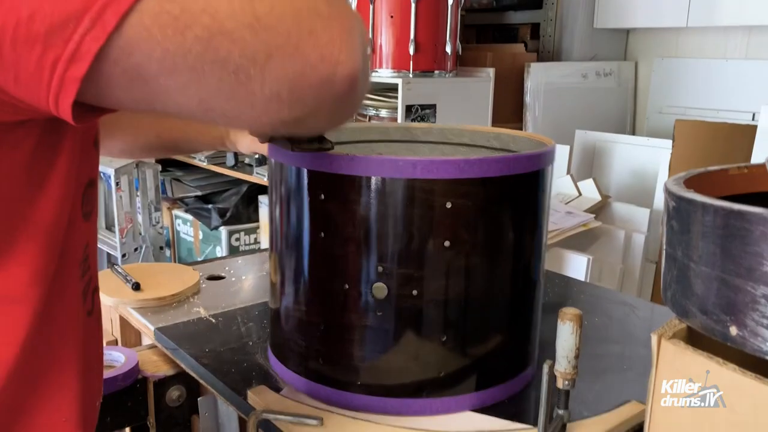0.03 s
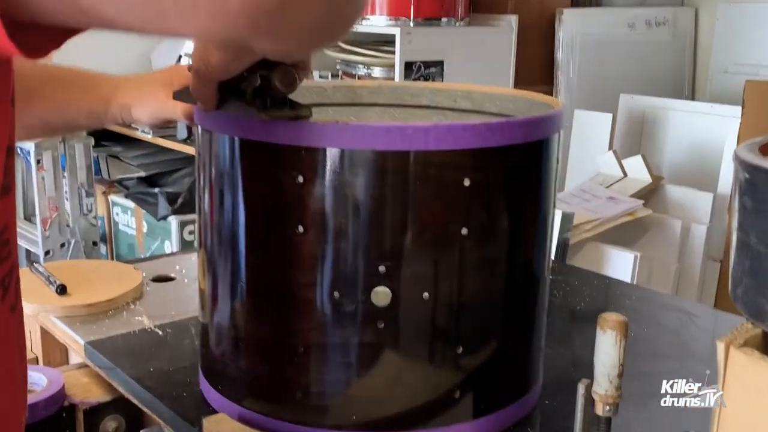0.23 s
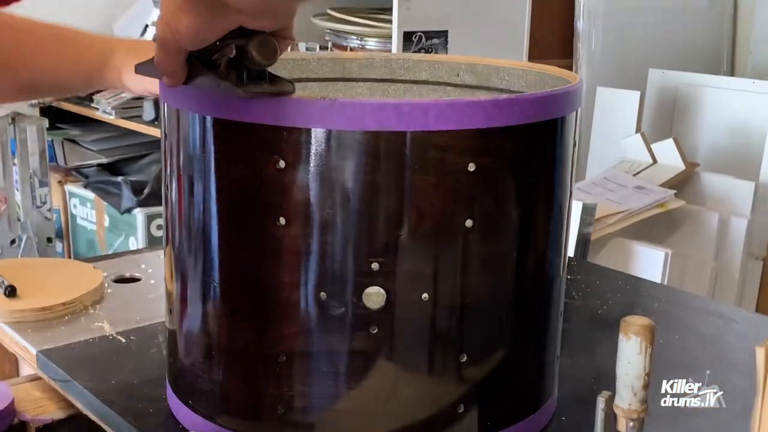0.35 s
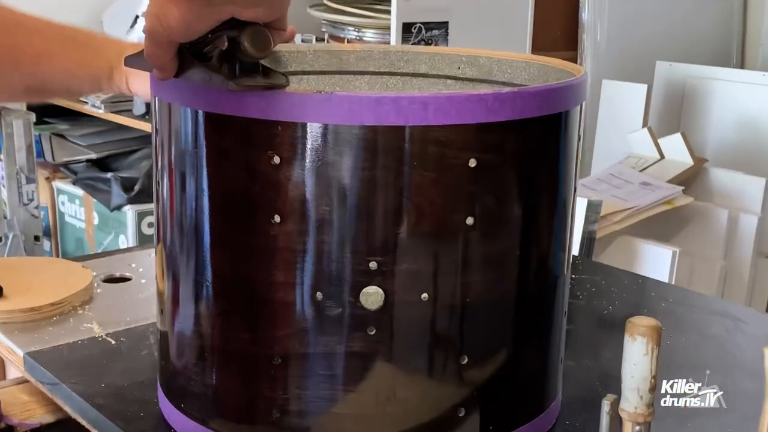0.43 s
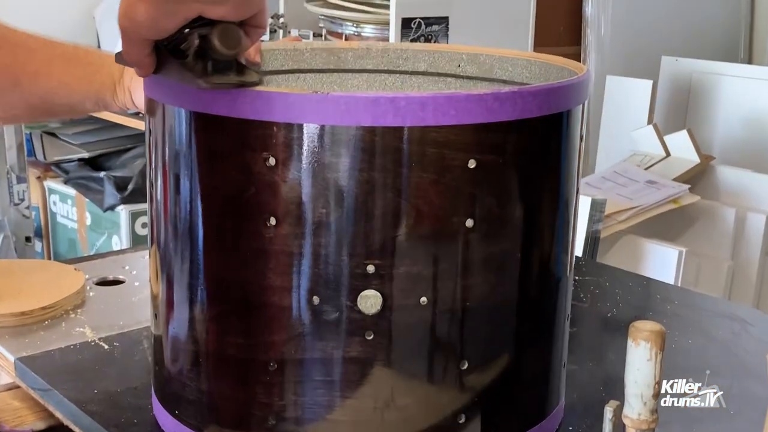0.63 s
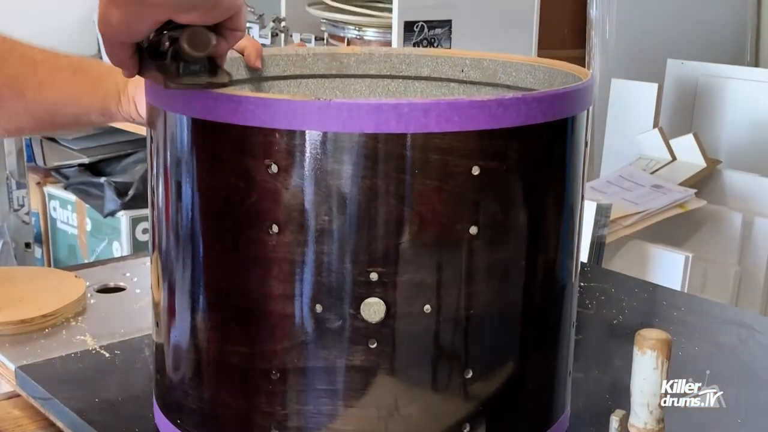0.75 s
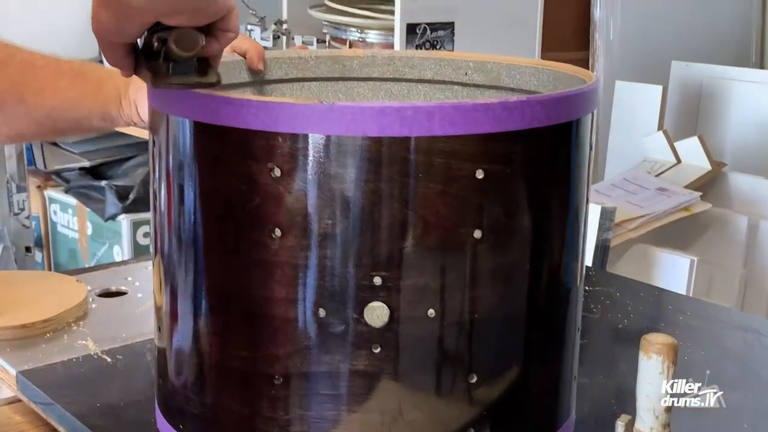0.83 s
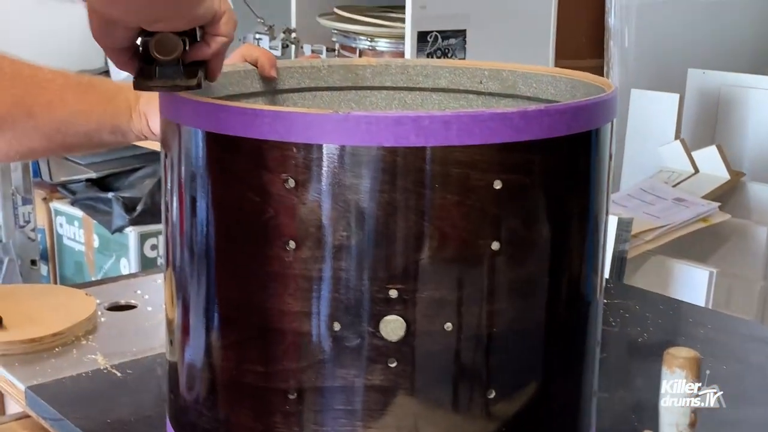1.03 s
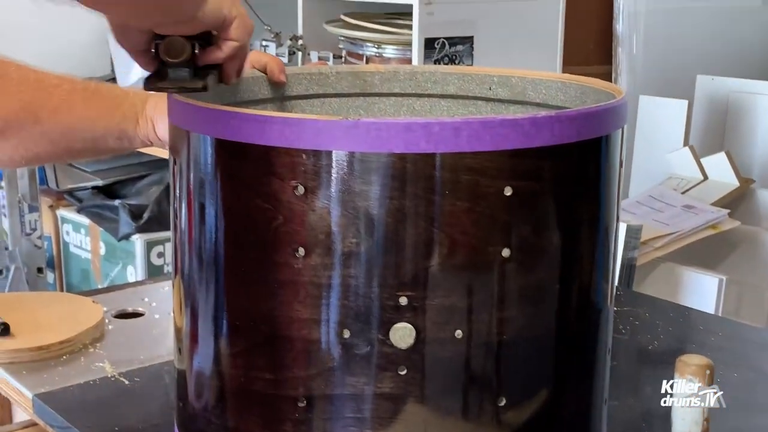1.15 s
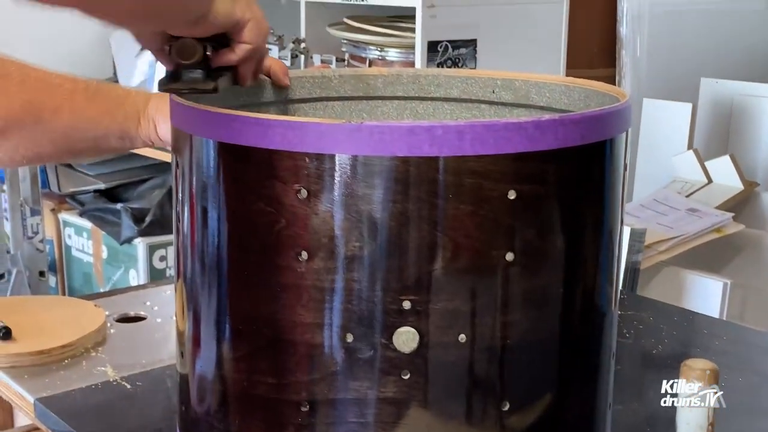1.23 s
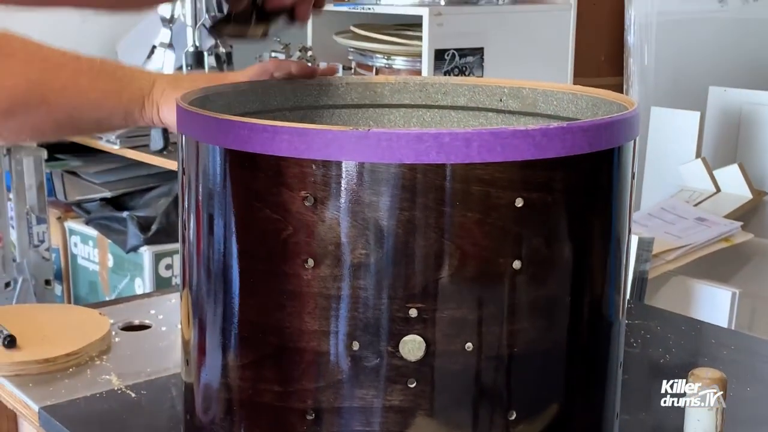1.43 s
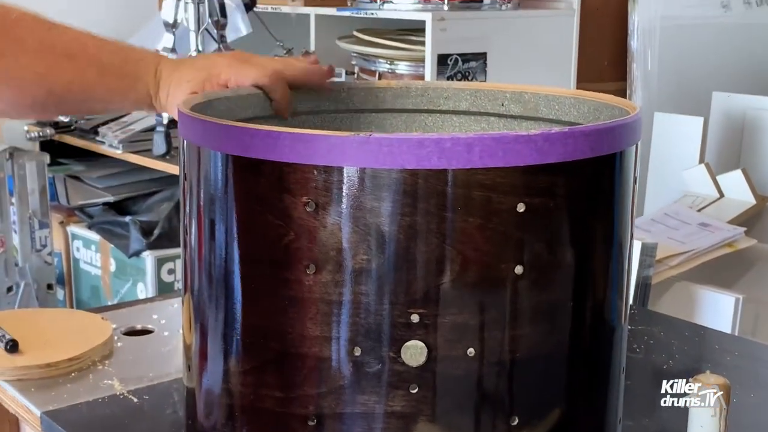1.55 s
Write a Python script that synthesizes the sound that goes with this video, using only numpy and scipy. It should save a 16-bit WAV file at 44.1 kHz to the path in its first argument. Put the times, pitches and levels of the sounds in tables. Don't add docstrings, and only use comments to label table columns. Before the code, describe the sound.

Hand plane on a hollow wooden drum rim: short slide, sharp knocks, long hissing, chattering shaving

```python
import sys
import numpy as np
from scipy import signal
from scipy.fft import rfft, irfft, next_fast_len
from scipy.io import wavfile

SR = 44100
rng = np.random.default_rng(int(sys.argv[2]) if len(sys.argv) > 2 else 0)


def wav_out(sig):
    wavfile.write(sys.argv[1], SR, np.round(np.clip(np.atleast_2d(sig).T, -1, 1) * 32767).astype(np.int16))


def field_ratio(decibels):
    return 10 ** (np.asarray(decibels, dtype=float) / 20)


N = 70560

# time in seconds, place along the rim from 0 to 1.
PLACE_ON_RIM = [(0, 0.69), (.3, 0.8), (.56, 0.5), (1.32, 0.9), (1.6, 1)]


def rms_one(x):
    return x / np.sqrt(np.mean(x ** 2) + 1e-20)


def in_time(rows):
    s, *columns = np.transpose(rows)
    return [np.interp(np.arange(N) / SR, s, c) for c in columns]


def at_hz(points, hz):
    table_hz, values = np.transpose(points)
    return np.interp(np.log(hz + 1), np.log(table_hz), values)


def colour(x, gain):
    size = next_fast_len(2 * N)
    hz = np.arange(size // 2 + 1) * SR / size
    return irfft(rfft(x, size) * gain(hz), size)[..., :N]


def drift(rate_hz):
    r = np.exp(-2 * np.pi * rate_hz / SR)
    noise = rng.standard_normal(N + SR)
    return rms_one(signal.lfilter([1], [1, -2 * r, r * r], noise)[SR:])


def ring(x, hz, width_hz):
    r, w = np.exp(-np.pi * width_hz / SR), 2 * np.pi * hz / SR
    return signal.lfilter([.5, 0, -.5], [1, -2 * r * np.cos(w), r * r], x + 1e-18)


def wide_ring(x, hz, share):
    width_hz = share * hz
    return ring(x, hz, width_hz) * 2 * np.pi * width_hz / SR


def mode(x, hz, width_hz):
    return ring(wide_ring(x, hz, .6), hz, width_hz)


def floor():
    # frequency in Hz, level in dB per Hz.
    rumble_spectrum = [(18, -13), (30, 7), (104, 12.5), (152, 0), (565, -13), (955, -6), (1300, -14),
                       (1730, -22), (9000, -37.5), (11700, -81), (19800, -120)]
    rumble_db, whine_db, whine_hz = -53.5, -78, 910
    common, *own = rng.standard_normal((3, N))
    air = colour(common + 0.37 * np.array(own), lambda hz: field_ratio(at_hz(rumble_spectrum, hz)) * (hz > 40))
    whine = rms_one(ring(common, whine_hz, 90))
    return field_ratio(rumble_db + 2.0 * drift(14)) * rms_one(air) + field_ratio(whine_db) * whine


def pressure():
    # time in seconds, cutting hiss in dB, drive into the shell in dB.
    stroke = [(.03, -87, 21.5), (.062, -58, 12), (.13, -55, 6), (.195, -53.5, 4.5), (.222, -46, 18),
              (.29, -58, 11.5), (.36, -83, 9.5), (.545, -87, 15), (.575, -65, 23), (.6, -51, 16),
              (.66, -45, 14), (.77, -39.5, 6.5), (.88, -40, 6.5), (.97, -43.5, 9), (1.1, -42.5, 10.5),
              (1.166, -36, 5.5), (1.296, -43.5, 8), (1.335, -66, 7)]
    # time in seconds, level in dB.
    brushes = [
        (0.489, -74.5),
        (1.371, -70),
        (1.455, -68),
    ]
    lift_off_db_per_s, brush_s = 411, .015
    t = np.arange(N) / SR
    hiss_db, drive_db = in_time(stroke)
    gain = field_ratio(hiss_db - lift_off_db_per_s * np.maximum(t - stroke[-1][0], 0))
    for s, db in brushes:
        gain = gain + field_ratio(db) * np.exp(-.5 * ((t - s) / brush_s) ** 2)
    return gain, field_ratio(drive_db)


def fibres():
    ticks_per_s, spread_db, flicker_db, flicker_hz = 6000, 1.5, .8, 120
    sizes = field_ratio(spread_db * np.minimum(rng.exponential(1, N), 4)) * rng.standard_normal(N)
    torn = rng.random(N) < ticks_per_s / SR
    return rms_one(sizes * torn * field_ratio(flicker_db * drift(flicker_hz)))


def iron():
    # frequency in Hz, level in dB per Hz.
    hiss_spectrum = [(2000, -10), (2400, 0), (3300, 2), (5600, 1.5), (8000, -2), (10800, -6), (12000, -15),
                     (15500, -1.5)]
    # frequency in Hz, width in Hz, level over the hiss in dB,
    # place where loudest from 0 to 1, loss one stroke away in dB.
    iron_modes = [(2702, 22, 5.5, 0, 28), (3062, 95, -12.5, 0.42, -13), (4436, 66, -6.5, 0.07, 23),
                  (4664, 74, -7, 0.5, -1), (6530, 47, -14.5, 0.6, 5), (7130, 97, -6, 0.14, 19.5),
                  (9630, 2200, -4, .5, 19)]
    slide_ends_s, sheen_db, sheen_hz = .4, 5, 8000
    tear = fibres()
    place, = in_time(PLACE_ON_RIM)
    edge = colour(tear, lambda hz: field_ratio(at_hz(hiss_spectrum, hz)) / (1 + (1800 / (hz + 1)) ** 4))
    high_pass = signal.butter(2, sheen_hz, "high", fs=SR, output="sos")
    sheen = signal.sosfilt(high_pass, fibres()) * (np.arange(N) < slide_ends_s * SR)
    rings = np.zeros(N)
    for hz, width_hz, db, best, lost_db in iron_modes:
        rings += field_ratio(db - lost_db * (place - best) ** 2) * rms_one(ring(tear, hz, width_hz))
    gain, _ = pressure()
    return gain * (rms_one(edge) + rings + field_ratio(sheen_db) * sheen)


def shell():
    # frequency in Hz, width in Hz, level where loudest in dB,
    # place where loudest from 0 to 1, loss one stroke away in dB.
    shell_modes = [(201.7, 23.6, 1, 1, 70), (314.3, 17.7, -7.5, 1, -8), (334.8, 7.6, 3.5, 0, 21),
                   (370.7, 34, -4, 0.71, 69), (440.6, 54, -5, 0.24, 11), (640, 24, 0, .2, 30),
                   (675, 20, 2, .2, 40), (713, 20, 2, .25, 45) , (854, 240, -9, .4, -0.5),
                   (1215, 220, -8, 0.2, 4), (1487, 32, -8.5, 1, 0), (1561, 17, -5.5, .28, 35),
                   (1660, 310, -10, 1, 16), (1998, 71, -7, 0.69, 60)]
    # time in seconds, level in dB, pitch of the jolt in Hz.
    catches = [(.606, -28, 680), (.634, -27, 680), (.6580, -18, 680), (.688, -26, 680), (.7180, -18, 690),
               (.7460, -23, 690), (.7735, -24, 690), (.802, -24, 700), (.572, -36, 680), (.835, -29, 700),
               (.870, -29, 700), (.780, -33, 1550), (.950, -35, 2025), (1.010, -31, 200), (1.085, -28, 360),
               (1.147, -24, 300), (1.166, -23, 200)]
    wood_band_hz, wood_bed_db, wander_db = [265, 2160], 2, .8
    gain, drive = pressure()
    place, = in_time(PLACE_ON_RIM)
    tear = fibres() * gain * drive
    jolts = np.zeros(N)
    for s, db, hz in catches:
        click = field_ratio(db) * (np.arange(N) == int(s * SR))
        jolts += wide_ring(click, hz, .2)
    band = signal.butter(3, wood_band_hz, "band", fs=SR, output="sos")
    out = field_ratio(wood_bed_db) * signal.sosfilt(band, tear)
    for hz, width_hz, db, best, lost_db in shell_modes:
        own = tear * rng.choice([-1, 1], N) * field_ratio(wander_db * drift(4.2))
        push = own * np.sqrt(4 * np.pi * width_hz / SR) + jolts
        out += mode(push * field_ratio(db - lost_db * (place - best) ** 2), hz, width_hz)
    return out


def knocks():
    # time in seconds, level in dB, contact cut-off in Hz,
    # share in the bench from 0 to 1.
    blows = [
        (0.187, -29.5, 197, 0.8),
        (0.2183, -8.5, 3380, 0.61),
        (0.2234, -13, 583, 0.6),
        (0.2383, -18, 740, 0.78),
        (.2670, -32, 3500, 1),
        (0.2722, -16, 940, 1),
        (.2860, -25.5, 1140, 1),
        (.5000, -26.5, 1500, 0),
        (1.298, -30, 428, 0.48),
    ]
    # frequency in Hz, level in dB, decay time t60 in seconds.
    bench_modes = [(102, -1.5, 0.092), (209, -9, 0.03), (250.1, 0, 0.15), (269.4, -10, 0.12),
                   (422, -7, 0.17), (613.5, -14, 0.2), (695, 3, 0.013), (903.4, -2.5, 0.066),
                   (991, -22.5, 0.21), (1322, -7.5, 0.023), (1438, -29, 0.18), (2060, -27, 0.036),
                   (2488, -15, 0.02)]
    rim_modes = [(91, -1, 0.21), (154, -1.5, 0.19), (218.2, 5, 0.12), (233, -12, 0.058), (358.5, -13, 0.24),
                 (440, -23, 0.069), (643, -6.5, 0.061), (1260, -25, .04), (1500, -16, .04)]
    modes = [*bench_modes, *rim_modes]
    out = np.zeros(N)
    luck_db = rng.normal(0, 1.5, (len(blows), len(modes)))
    for (s, db, cut_hz, share), row in zip(blows, luck_db):
        click = np.zeros(SR // 2)
        click[0] = field_ratio(db)
        contact = signal.butter(2, [cut_hz / 6, cut_hz], "band", fs=SR, output="sos")
        click = signal.sosfilt(contact, click)
        gains = [share] * len(bench_modes) + [1 - share] * len(rim_modes)
        rung = np.zeros(SR // 2)
        for (hz, level_db, t60), g, v in zip(modes, gains, row):
            width_hz = np.log(1000) / np.pi / t60
            rung += g * field_ratio(level_db + v) * mode(click, hz, width_hz)
        i = int(s * SR)
        out[i:i + SR // 2] += rung[:N - i]
    return out


def cracks():
    # start in seconds, level in dB.
    ticks = [
        (.2178, -30),
        (.2405, -36),
        (.267, -36),
    ]
    t60 = 0.004
    t = np.arange(N) / SR
    shape = sum(field_ratio(db - 60 * np.abs(t - s) / t60) * (t >= s) for s, db in ticks)
    return colour(shape * rng.standard_normal(N), lambda hz: hz / (hz + 800) / (1 + hz / 4000))


def workshop(x):
    # frequency in Hz, level of the reflections in dB.
    wet_spectrum = [(100, -16), (400, -14), (1200, -6), (2500, -1), (5500, -2), (7500, -13), (8600, -22),
                    (13000, -26)]
    early_t60, late_t60, late_db, wall_hz = 0.068, 0.26, -3, 4100
    t = np.arange(SR) / SR
    early, *late = rng.standard_normal((3, SR))
    late = signal.lfilter([1], [1, -np.exp(-2 * np.pi * wall_hz / SR)], late)
    early = rms_one(early * field_ratio(-60 * t / early_t60))
    late = rms_one(late * field_ratio(-60 * t / late_t60))
    response = (early * [[1], [-1]] + field_ratio(late_db) * late) / np.sqrt(SR)
    wet = signal.fftconvolve(x[None], response)[:, :N]
    return colour(wet, lambda hz: field_ratio(at_hz(wet_spectrum, hz)))


def scene():
    near = shell() + iron() + knocks() + cracks()
    near = signal.sosfilt(signal.butter(3, 82, "high", fs=SR, output="sos"), near)
    return near + workshop(near) + floor()


def roll_off(x):
    return signal.sosfilt(signal.butter(12, 15930, fs=SR, output="sos"), x)


def record(dry):
    # frequency in Hz, lead of the right port in radians.
    port_phase = [(200, 0), (1700, 0), (5200, -2.2), (6300, 0), (8650, 3.14), (11050, 6.28), (13400, 9.42),
                  (15700, 12.57)]
    # frequency in Hz, left over right in dB.
    port_balance = [(150, -1.5), (300, 1), (700, 1), (1700, 0.5), (3000, 1), (5300, -4.5), (6800, -1.5),
                    (15000, 2)]
    side = np.array([[1], [-1]])

    def response(hz):
        level = field_ratio(side * at_hz(port_balance, hz) / 2)
        turn = np.exp(-.5j * side * np.interp(hz, *np.transpose(port_phase)))
        return (hz < 15300) * level * turn

    return roll_off(colour(dry, response))


dry = scene()
out = record(dry)
wav_out(out)
```